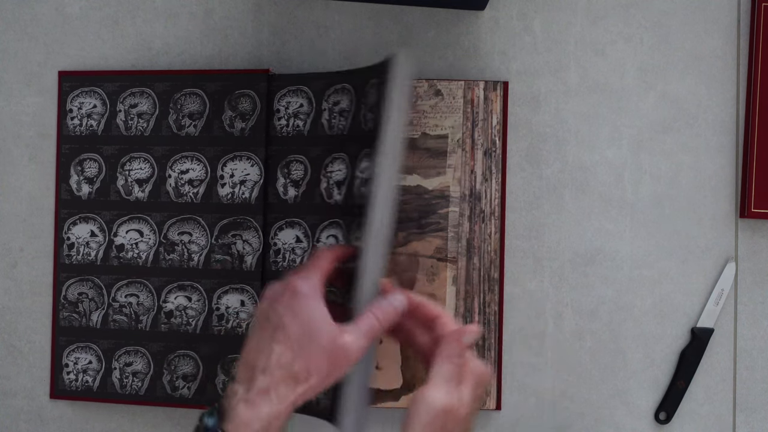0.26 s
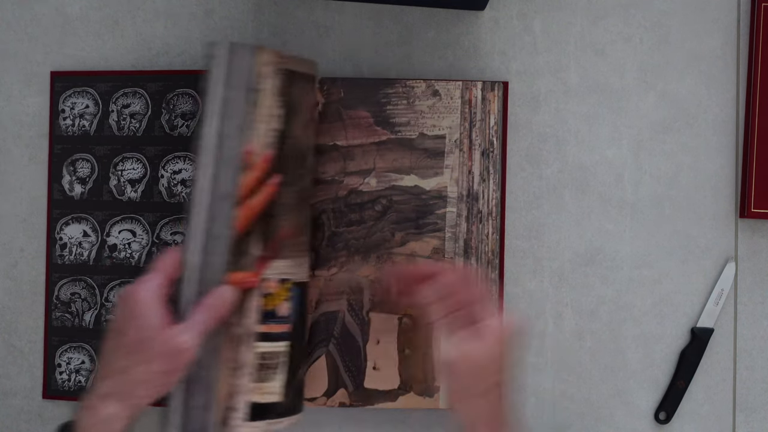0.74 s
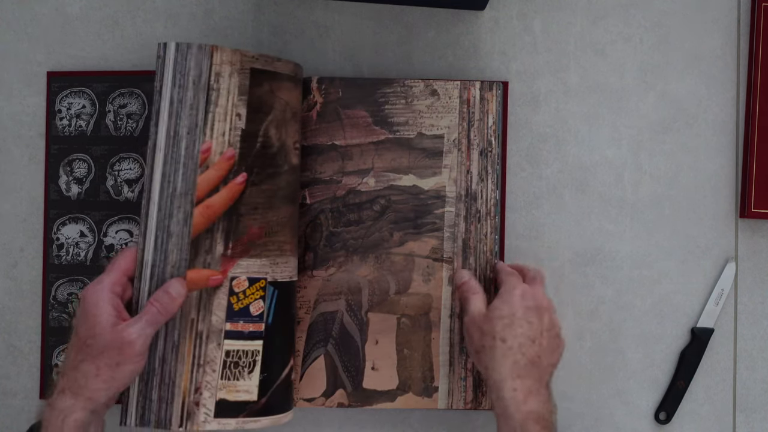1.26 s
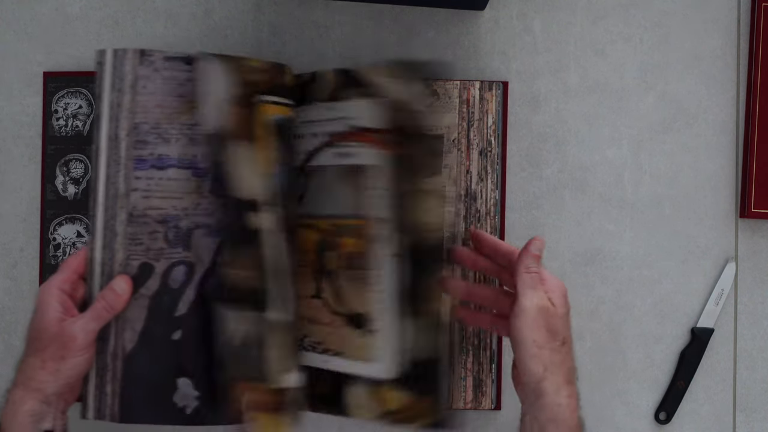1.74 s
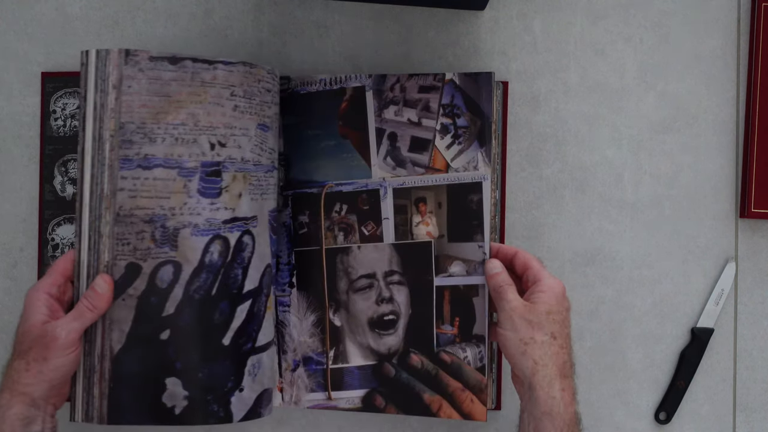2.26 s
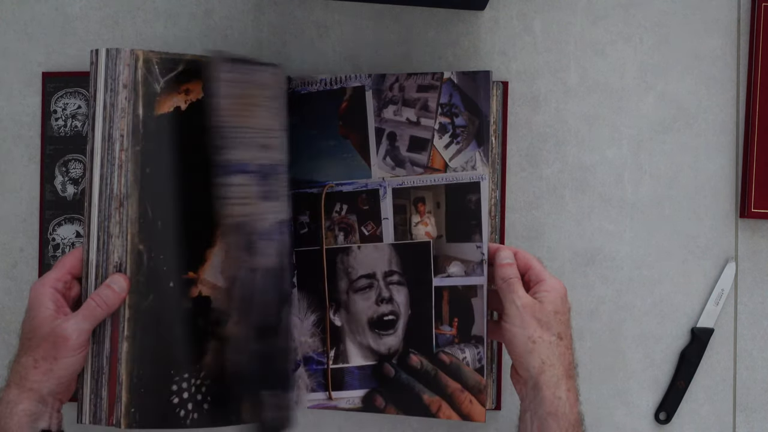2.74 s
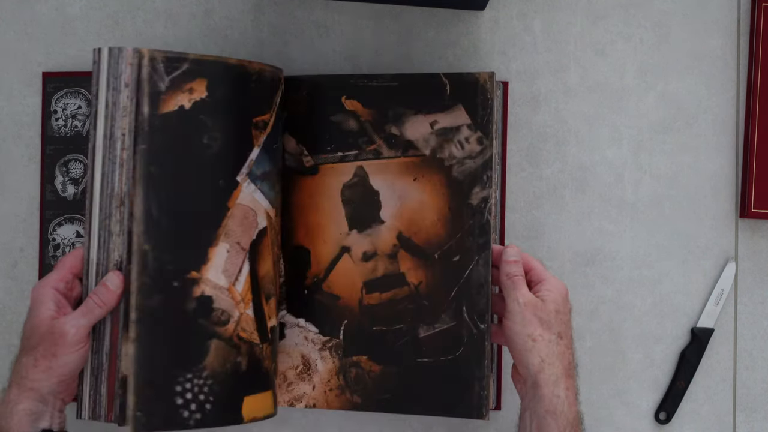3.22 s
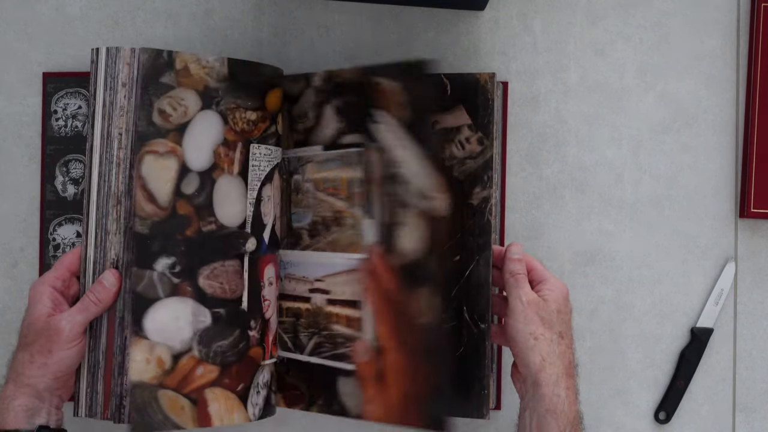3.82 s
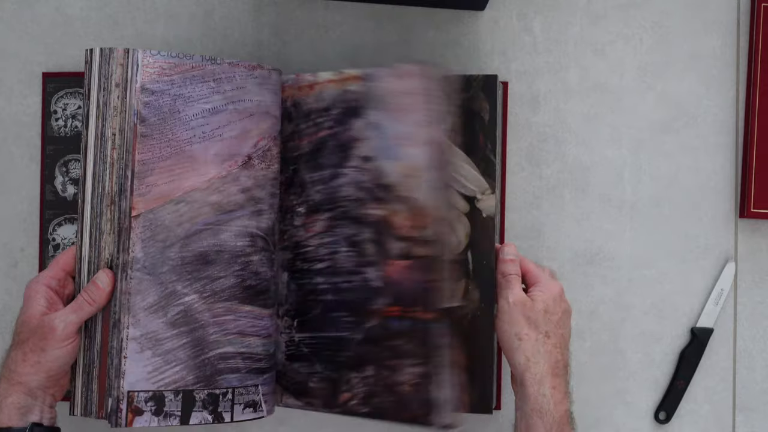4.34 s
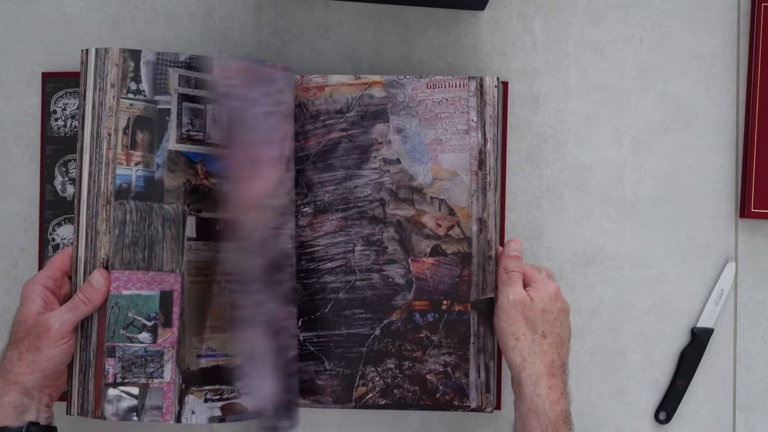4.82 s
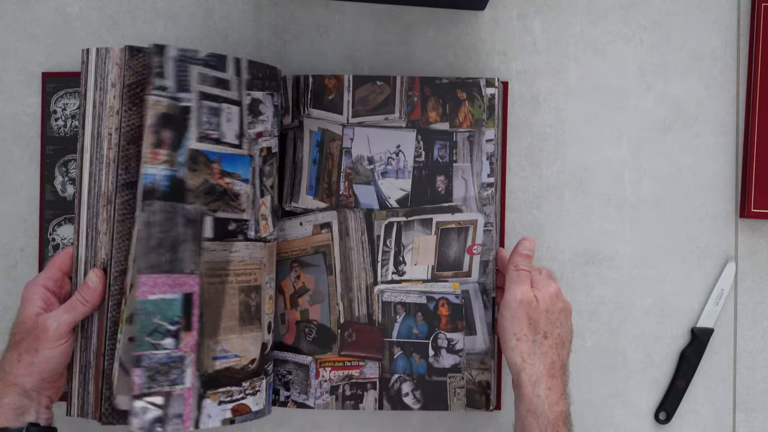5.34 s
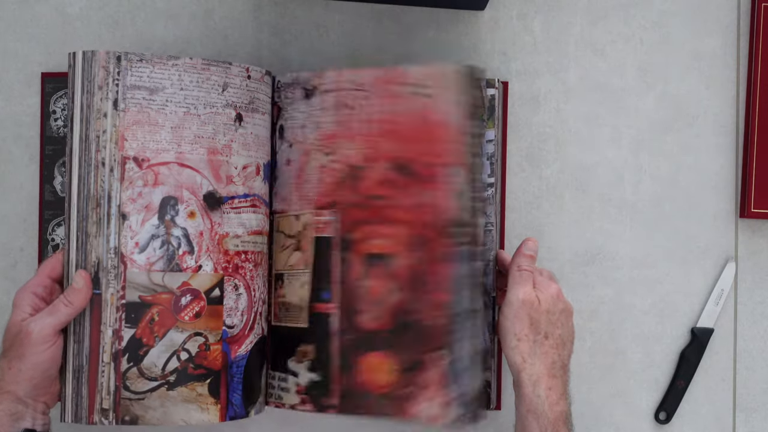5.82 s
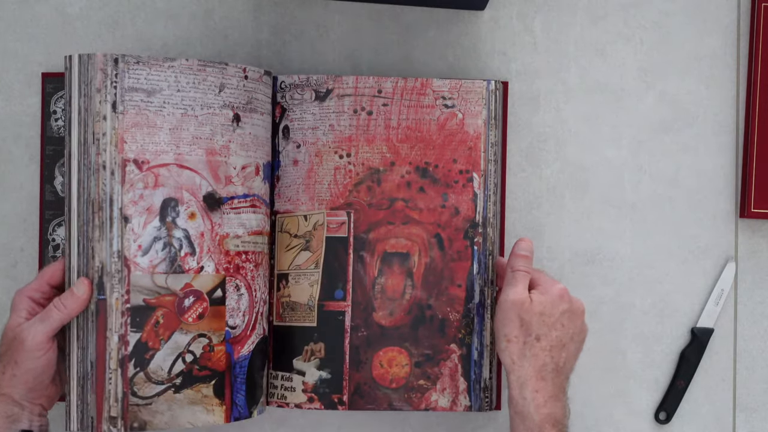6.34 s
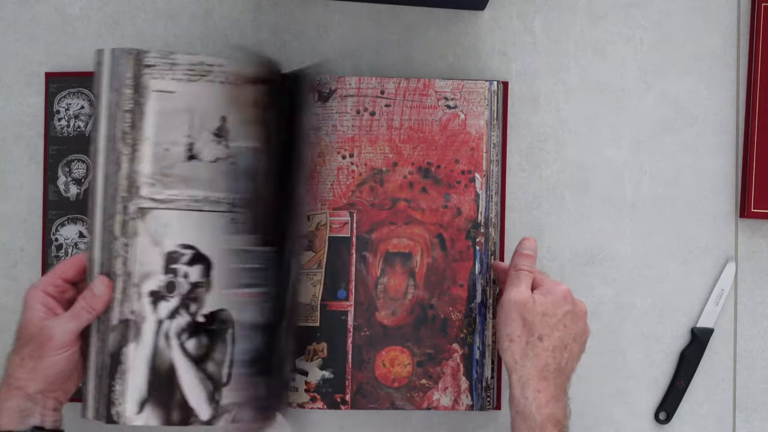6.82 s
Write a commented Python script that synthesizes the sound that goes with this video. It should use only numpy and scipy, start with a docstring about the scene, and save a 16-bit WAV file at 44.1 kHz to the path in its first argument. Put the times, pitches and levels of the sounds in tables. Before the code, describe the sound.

Close, glossy book pages tick, slide and flap down as they are turned, over a faint low room rumble.

```python
"""In a quiet bare room, the stiff glossy pages of a large book are turned by hand on a table, close by.
A bent sheet ticks as small kinks jump in it, and snaps when the whole sheet buckles. It hisses as it
slides over its neighbour, then flaps down on the pile with a puff of air.
The room rings on after each sound, over a steady rumble and a faint low tone that comes and goes."""
import sys
import numpy as np
from scipy import signal
from scipy.fft import rfft, irfft
from scipy.io import wavfile

SR = 44100
rng = np.random.default_rng(int(sys.argv[2]) if len(sys.argv) > 2 else 0)


def master(y):
    """Save y as 16-bit WAV."""
    cut = np.clip(np.atleast_2d(y).T, -1, 1)
    pcm = np.round(cut * 32767)  # scale
    wavfile.write(sys.argv[1], SR, pcm.astype(np.int16))


N = 311787
T = np.arange(N) / SR
SIZE = 16384  # samples set aside for one short sound
TOP_HZ = 16000


def undb(db):
    """Turn decibels into a number to multiply by."""
    return 10 ** (np.asarray(db) / 20)


def level(x, db):
    """Scale a steady sound to an average (rms) level."""
    return x * undb(db) / np.sqrt(np.mean(x ** 2))


def add(track, x, s, db):
    """Add a short sound at s seconds, with as much energy as 10 ms of steady sound at level db."""
    start = max(int(s * SR), 0)
    x = x * undb(db) * np.sqrt(SR / 100 / np.sum(x ** 2))
    track[start:start + len(x)] += x[:max(N - start, 0)]


def bins(size):
    """The frequencies in the spectrum of this many samples, never below 1 Hz."""
    return np.maximum(np.fft.rfftfreq(size, 1 / SR), 1)


def along(points, f):
    """Read a curve through (Hz, value) points, with octaves evenly spaced."""
    hz, value = np.transpose(points)
    return np.interp(np.log(f), np.log(hz), value)


def resonance(f, hz, width):
    """How a body that rings at hz responds to each frequency; narrower rings longer."""
    return 1 / (1 + 1j * (f ** 2 - hz ** 2) / (f * width))


def causal(gain):
    """Turn a gain curve into a filter that rings only after it is struck."""
    cepstrum = irfft(np.log(gain + 1e-9))
    cepstrum[1:] *= 2
    cepstrum[len(cepstrum) // 2:] = 0
    return np.exp(rfft(cepstrum))


def flutter(envelope, passes=2):
    """Spectrum of a random push shaped by a loudness curve, about equally strong at all frequencies."""
    push = rng.standard_normal(SIZE) * envelope
    for _ in range(passes):
        evened = irfft(np.exp(1j * np.angle(rfft(push))))
        push = evened * envelope ** 0.25
    return rfft(push)


def background(air_db=-63):
    """Steady rumble and faint hiss keep a few low room resonances booming."""
    # The tone of the noise. Each row: frequency in Hz, relative strength in dB.
    colour = [(18, -37), (30, -9), (65, -16), (89, 2.5), (116, -3), (154, 1.5), (247, -1), (374, -3.5),
              (460, -4.5), (662, -7), (1060, -10), (1780, -12), (3780, -20), (5030, -22), (15000, -27)]
    # The room's booms. Each row: pitch in Hz, half the resonance width in Hz, level in dB.
    booms = [(54.4, 3.6, -87), (98.4, 4, -95.5), (160.5, 35, -76)]
    # Stereo width. Each row: frequency in Hz, side (left minus right) against middle in dB.
    stereo_width = [(40, -15), (130, -8), (300, -5), (2000, -5), (8000, -9.5), (14000, -47)]
    f = bins(N)
    parts = []
    for gain in (1, undb(along(stereo_width, f))):
        noise = rfft(rng.standard_normal(N))
        air = level(irfft(noise * undb(along(colour, f)), N), air_db)
        for hz, half_width, db in booms:
            boom = rfft(rng.standard_normal(N)) * resonance(f, hz, 2 * half_width) ** 2
            air += level(irfft(boom, N), db)
        parts.append(irfft(rfft(air) * gain, N))
    middle, side = parts
    return np.array([middle + side, middle - side])


def drone(pitch_hz=98.2, waver_hz=2.07, swell_s=0.13):
    """A faint low tone comes and goes, its pitch wavering."""
    # The tone's swells. Each row: time of the peak in seconds, level in dB.
    swells = [(.098, -72.5), (2.52, -66.5), (3.93, -68)]
    drift = np.interp(T, np.linspace(0, T[-1], 60), rng.standard_normal(60))
    loudness = sum(undb(db) * np.exp(-((T - s) / swell_s) ** 2) for s, db in swells)
    phase = 2 * np.pi * np.cumsum(pitch_hz + waver_hz * drift) / SR
    return np.sqrt(2) * loudness * np.sin(phase)


def kink(db, hz, decay, spread_s=0.000571, floor_db=-20, lowest_hz=1100):
    """A kink sends a bending wave through the sheet, highs ahead of lows; stronger kinks ring purer."""
    f = bins(SIZE)
    bending = np.exp(-4j * np.pi * spread_s * np.sqrt(f * lowest_hz))
    into_air = (1j * f / (lowest_hz + 1j * f)) ** 3  # the sheet gives off little bass
    width = hz * 0.34 * 2 ** ((-46.5 - db) / 6.5)  # 34% of the pitch at -46.5 dB, halved per 6.5 dB more
    ring = causal(np.abs(resonance(f, hz, width)) + undb(floor_db))
    push = flutter(np.exp(-T[:SIZE] / decay))
    return irfft(push * ring * bending * into_air)


def ticks():
    """Single kinks jump and stand out as the sheet is lifted and bent."""
    # Each row: start in seconds, level in dB, pitch in Hz, fade time of the push in seconds.
    kinks = [(0.0186, -47, 5700, 0.000046), (.2632, -53, 6300, 0.0016), (0.9076, -56.5, 5500, 0.0068),
             (1.8547, -42.5, 2700, 0.0029), (2.9092, -54.5, 9200, 0.00013), (2.9216, -61, 9500, 0.00044),
             (2.971, -58, 12500, 0.00044), (3.0243, -53.5, 11500, 0.00024), (3.0713, -47, 7500, 0.00012),
             (3.0945, -48, 3620, 0.0025), (3.8471, -58.5, 2320, 0.00047), (3.9225, -62, 11000, 0.000092),
             (3.9426, -54, 7560, .0002), (4.084, -48.5, 2370, 0.00028), (5.243, -60.5, 2370, 0.012),
             (5.9001, -37.5, 7270, 0.0015), (6.0063, -29.5, 1830, 0.0011), (6.311, -58, 5500, .005),
             (6.457, -56, 3450, 0.0098), (7.0014, -59, 8000, .0012)]
    out = np.zeros(N)
    for s, db, hz, decay in kinks:
        add(out, kink(db, hz, decay), s, db)
    return out


def slides(grain_db=-0.5, slips_per_s=3500, breadth=1.45, fall_ratio=1.33):
    """Paper fibres catch and slip: a dense spray of tiny uneven clicks makes the page ring."""
    # Paper or a fingertip sliding over paper.
    # Each row: time of the peak in seconds, level in dB, rise time in seconds, centre pitch in Hz.
    strokes = [(.96, -63.5, 0.067, 5300), (1.395, -67, 0.02, 11000), (1.69, -64, 0.066, 2680),
               (1.87, -59, 0.078, 3620), (1.98, -59.5, 0.043, 7000), (2.076, -53.5, .0045, 5960),
               (2.19, -63.5, 0.08, 5630), (3, -55, .014, 8350), (4.19, -67.5, 0.053, 4000),
               (5.265, -60.5, .016, 2970), (5.8, -73, 0.26, 7000)]
    # A rubbed page sings faintly. Each row: pitch in Hz, width in Hz, dB against the plain hiss.
    rub_tones = [(2650, 120, 8), (3770, 320, -3.5), (5640, 310, -9)]
    out, f = np.zeros(N), bins(N)
    page = 1 + sum(undb(db) * resonance(f, hz, width) for hz, width, db in rub_tones)
    for s, db, rise, hz in strokes:
        sizes = undb(grain_db * np.minimum(rng.exponential(size=N), 5))
        slipping = rng.random(N) < slips_per_s / SR
        clicks = sizes * slipping * rng.standard_normal(N)
        spray = irfft(rfft(clicks) * page * resonance(f, hz, breadth * hz), N)
        swell = np.exp(-np.abs(T - s) / np.where(T < s, rise, fall_ratio * rise))
        out += level(spray, db) * swell
    return out


def crinkles(count=6, scatter_db=0.5, pitch_hz=10000, decay_s=0.00049):
    """Faint kinks follow each other at uneven gaps while a sheet is held bent."""
    # Each row: start in seconds, length in seconds, level of one kink in dB.
    bends = [(0.945, 0.2, -65), (2.96, 0.055, -73), (6.964, 0.023, -66.5)]
    out = np.zeros(N)
    for start, length, db in bends:
        for s in start + length * (np.arange(count) + rng.random(count)) / count:
            size_db = db + scatter_db * rng.standard_normal()
            add(out, kink(size_db, pitch_hz, decay_s), s, size_db)
    return out


def flaps(steepness=3, fall_ratio=1.34):
    """The broad page wobbles and pushes out a puff of air; a harder flap spans more frequencies."""
    # A page bulging out or landing on its cushion of air.
    # Each row: time of the peak in seconds, level in dB, rise time in seconds, centre pitch in Hz.
    puffs = [(1.683, -48.5, 0.015, 1180), (1.893, -34.5, 0.0053, 1030), (1.946, -47.5, 0.036, 1600),
             (2.013, -43, .017, 520), (2.035, -33.5, 0.0083, 840), (3.106, -41, 0.012, 1030),
             (4.55, -62, 0.016, 523), (5.115, -51.5, .003, 523), (5.133, -48, 0.0057, 590),
             (5.13, -61, .017, 1320), (5.25, -54, 0.019, 1140), (5.921, -44, .011, 477),
             (5.9756, -41, 0.0024, 570), (5.987, -46.5, 0.0075, 570), (7.035, -49, 0.034, 440),
             (7.0635, -45, 0.0027, 540)]
    # The tone all flaps share. Each row: frequency in Hz, gain in dB.
    colour = [(120, -16.5), (250, -4.5), (480, -4), (610, 0), (770, -4), (1000, -2), (1180, -5.5),
              (1350, -5.5), (2600, -5), (6000, 5.5), (16000, 12)]
    out, f = np.zeros(N), bins(SIZE)
    lead = SIZE / SR / 2  # seconds before the puff peaks
    t = T[:SIZE] - lead
    for s, db, rise, hz in puffs:
        puff = np.exp(-(t / np.where(t < 0, rise, fall_ratio * rise)) ** 2)
        octaves = 0.74 + 0.02 * (db + 42.5)
        low_hz, high_hz = hz / 2 ** (octaves / 2), hz * 2 ** (octaves / 2)
        band = 1 / np.hypot(1, (f / high_hz) ** steepness) / np.hypot(1, (low_hz / f) ** steepness)
        tone = causal(undb(along(colour, f)) * band)
        add(out, irfft(flutter(puff) * tone), s - lead, db)
    return out


def snaps(lowest_hz=470, thump_db=-32, thump_decay_s=0.048):
    """A fold races across the page in milliseconds, rings the whole sheet and thumps the pile below."""
    # The sheet buckling.
    # Each row: start in seconds, level in dB, fade time in seconds, treble tilt in dB per octave.
    buckles = [(1.8563, -49, 0.024, 0.5), (1.8812, -42.5, .0068, -2), (1.973, -43.5, 0.0078, 3),
               (2.025, -39.5, 0.012, -1.3), (3.0934, -42.5, 0.0097, -2), (5.8994, -42.5, 0.0052, -1.5),
               (5.9758, -41.5, 0.0085, 2), (6.0062, -24.7, 0.0026, 2), (6.017, -42, 0.0054, 4)]
    # The sheet's resonances. Each row: pitch in Hz, width in Hz, gain in dB.
    sheet_tones = [(614, 183, 7), (824, 450, 6.5), (1257, 100, 8.5), (1835, 440, 7), (2570, 770, 0),
                   (4080, 480, 1), (5650, 720, -2.5), (7900, 1100, -11), (13700, 11000, -29)]
    out, f = np.zeros(N), bins(SIZE)
    power = sum(np.abs(undb(db) * resonance(f, hz, width)) ** 2 for hz, width, db in sheet_tones)
    sheet = np.sqrt(power) / np.hypot(1, (lowest_hz / f) ** 2)
    pile = resonance(f, hz=187, width=62) ** 2
    octaves_up = np.log2(f / sheet_tones[0][0])
    for s, db, decay, tilt_db in buckles:
        colour = causal(sheet * undb(tilt_db * octaves_up))
        crack = irfft(flutter(np.exp(-T[:SIZE] / decay)) * colour)
        thump = irfft(flutter(np.exp(-T[:SIZE] / thump_decay_s)) * pile)
        add(out, crack, s, db)
        add(out, thump, s, db + thump_db)
    return out


def echoes(x):
    """The direct sound, followed by its first bounces off the table and nearby surfaces."""
    # Each row: delay in seconds, level against the direct sound in dB.
    bounces = [(.0013, -24), (.0034, -17.5), (.0056, -28)]
    padded = N + SIZE
    f = bins(padded)
    paths = 1 + sum(undb(db) * np.exp(-2j * np.pi * f * delay) for delay, db in bounces)
    return irfft(rfft(x, padded) * paths, padded)[:N]


def room(x, onset_s=0.0004, build_s=0.00036, bands=16):
    """Dense wall echoes fade at their own rate in each frequency band, nearly alike in both ears."""
    # How long the room rings. Each row: frequency in Hz, seconds to fade by 60 dB.
    ring_times = [(150, 1), (500, 0.64), (1500, 0.77), (4500, 0.64), (8000, 0.56), (15000, 0.35)]
    # The tone of the echoes. Each row: frequency in Hz, gain in dB.
    colour = [(100, 15), (600, -1), (1800, 1), (3000, 2), (5500, 5), (9000, 5), (16000, 7)]
    # Stereo width. Each row: frequency in Hz, side (left minus right) against middle in dB.
    stereo_width = [(200, -10), (700, -9), (2500, -12), (4000, -13.5), (7000, -63.5)]
    f, t = bins(SR), T[:SR]
    centres = np.geomspace(100, TOP_HZ, bands)
    fade_in = 1 - np.exp(-np.maximum(t - onset_s, 0) / build_s)
    parts = []
    for gain in (1, undb(along(stereo_width, f))):
        noise = rfft(rng.standard_normal(SR)) * gain * undb(along(colour, f))
        tail = np.zeros(SR)
        for hz, only_this_band in zip(centres, np.eye(bands)):
            band = np.interp(np.log(f), np.log(centres), only_this_band)
            tail += irfft(noise * band, SR) * undb(-60 * t / along(ring_times, hz))
        parts.append(signal.fftconvolve(x, tail * fade_in / np.sqrt(SR / 20))[:N])
    middle, side = parts
    return np.array([middle + side, middle - side])


def scene():
    """The book lies close and dead centre; each kind of sound throws its own share into the room."""
    tick, snap, flap, slide = ticks() + crinkles(), snaps(), flaps(), slides()
    thrown = tick * undb(-7) + snap * undb(-4) + flap * undb(-4) + slide * undb(-5)
    return echoes(tick + snap + flap + slide) + room(thrown) + background() + drone()


def record(dry, low_cut_hz=42):
    """Trim the deepest rumble and cut the highest treble steeply."""
    trimmed = signal.sosfilt(signal.butter(2, low_cut_hz, "high", fs=SR, output="sos"), dry)
    return signal.sosfilt(signal.ellip(10, .2, 70, TOP_HZ, fs=SR, output="sos"), trimmed)


dry = scene()
out = record(dry)
master(out)
```